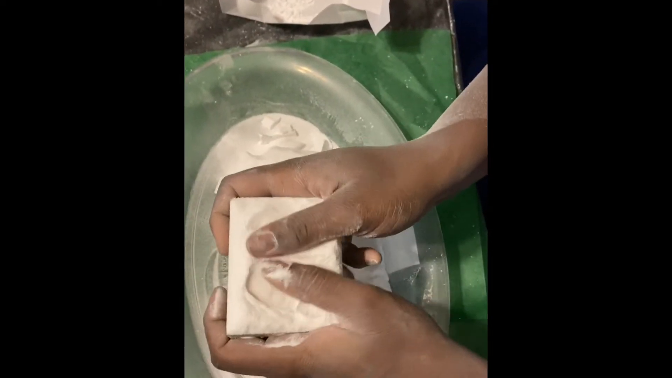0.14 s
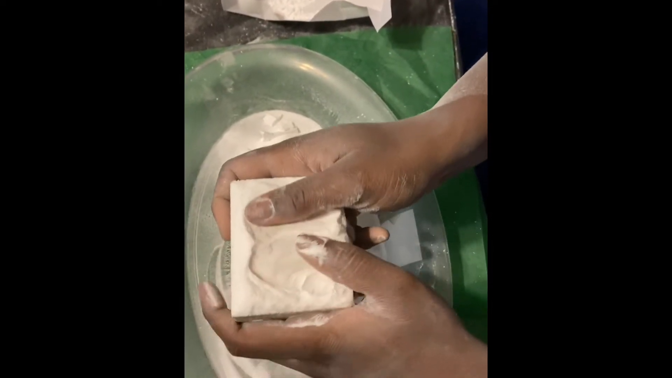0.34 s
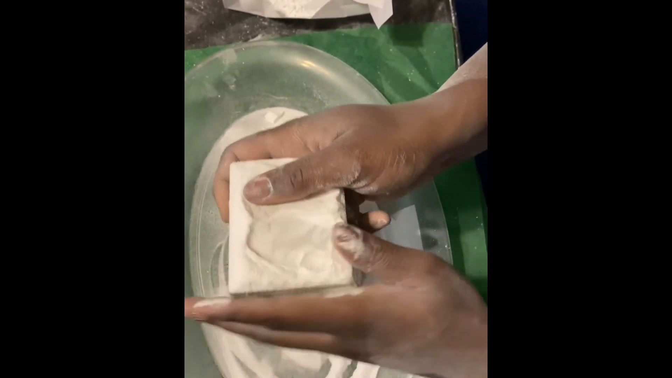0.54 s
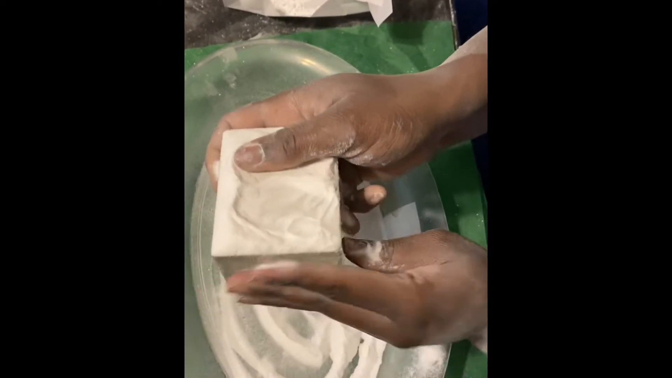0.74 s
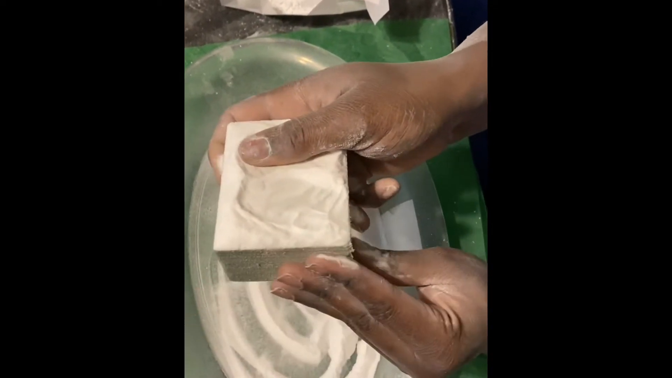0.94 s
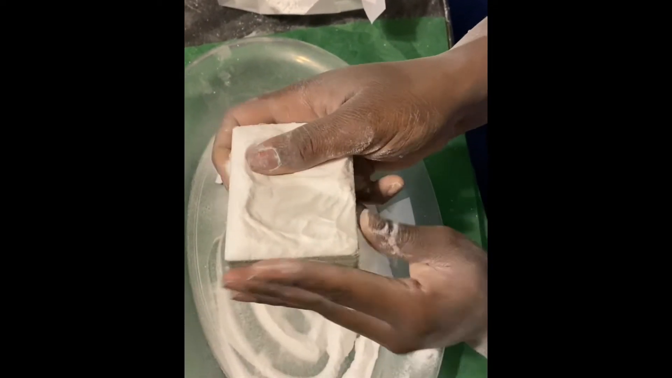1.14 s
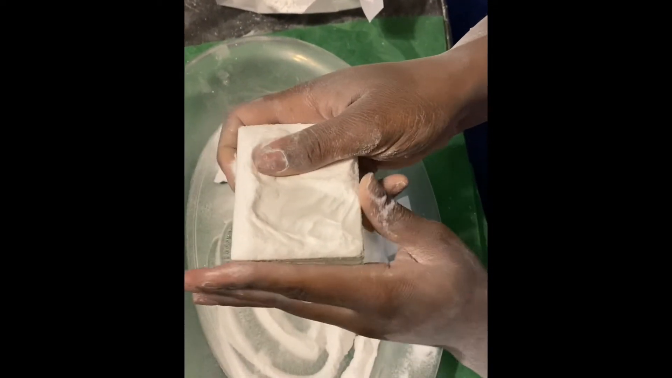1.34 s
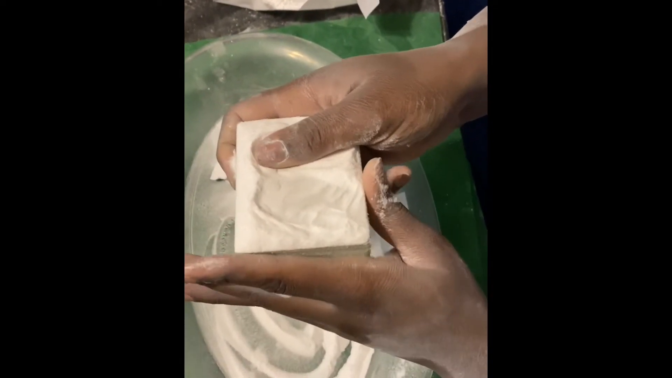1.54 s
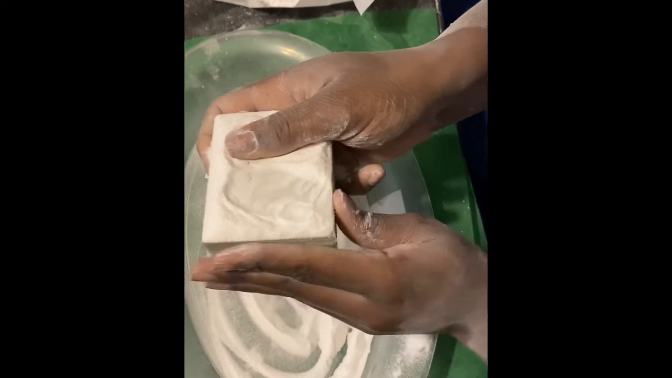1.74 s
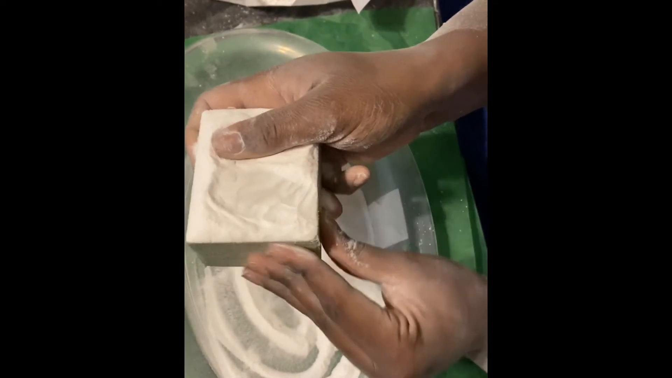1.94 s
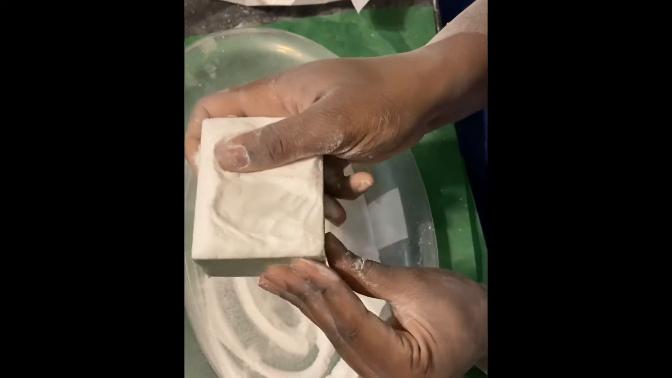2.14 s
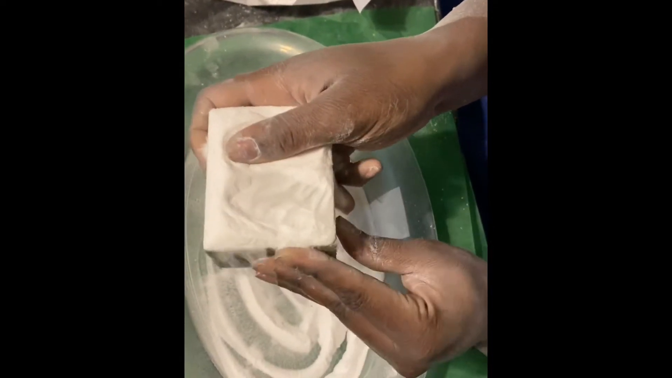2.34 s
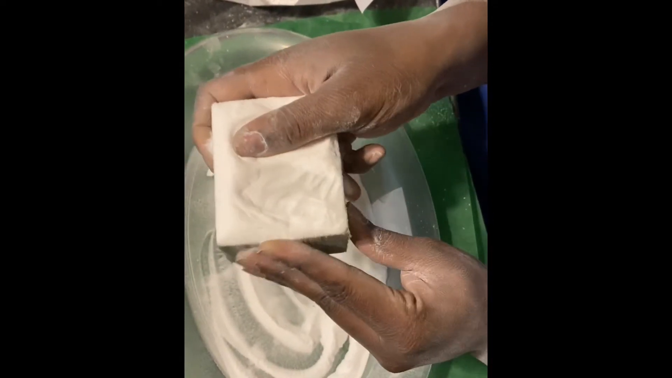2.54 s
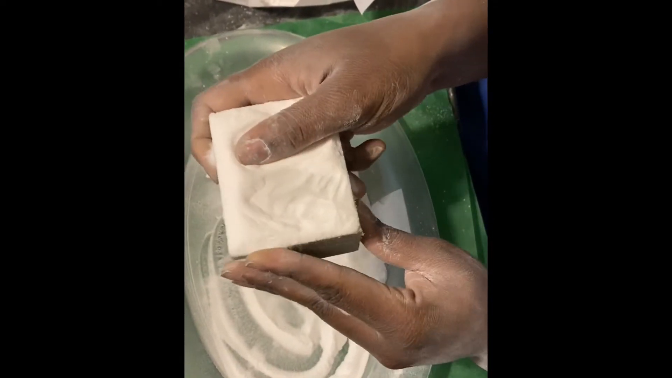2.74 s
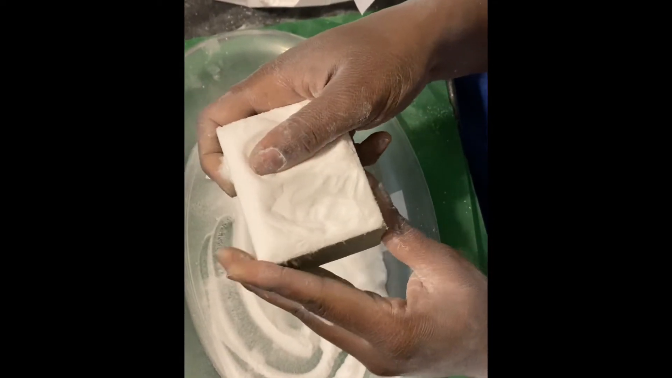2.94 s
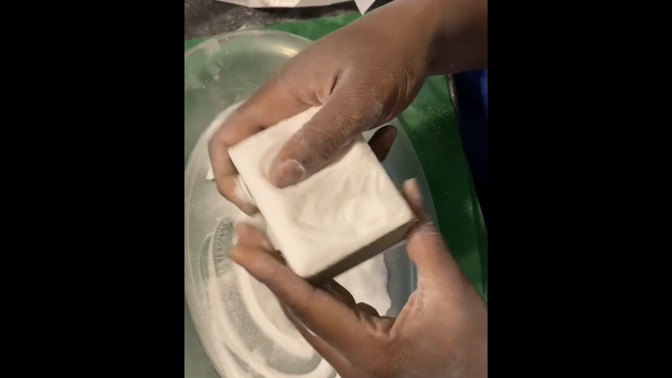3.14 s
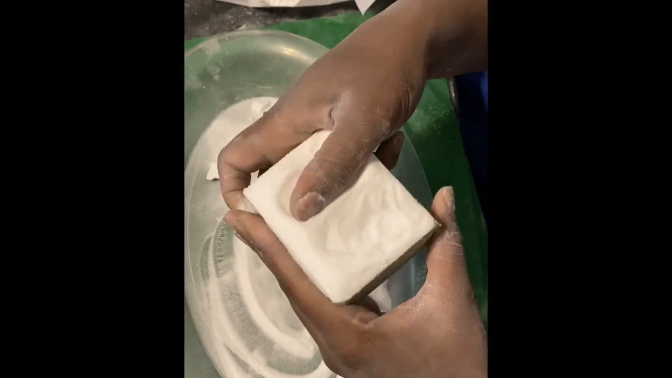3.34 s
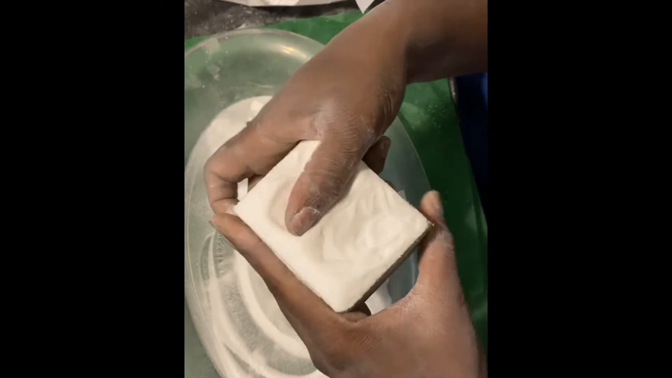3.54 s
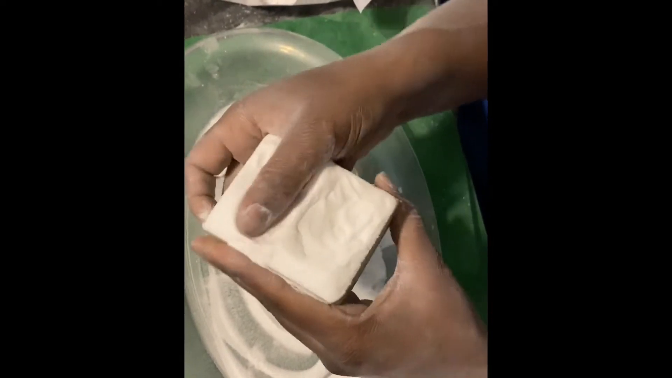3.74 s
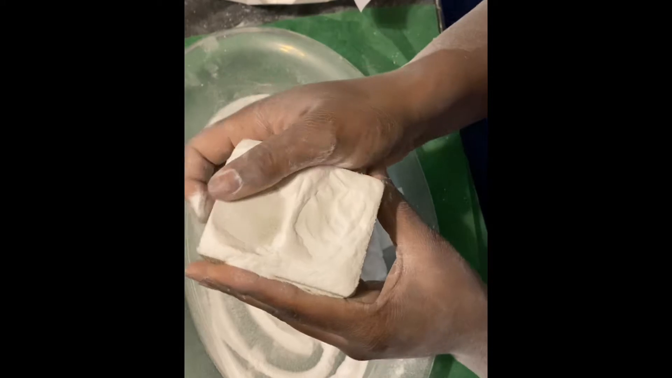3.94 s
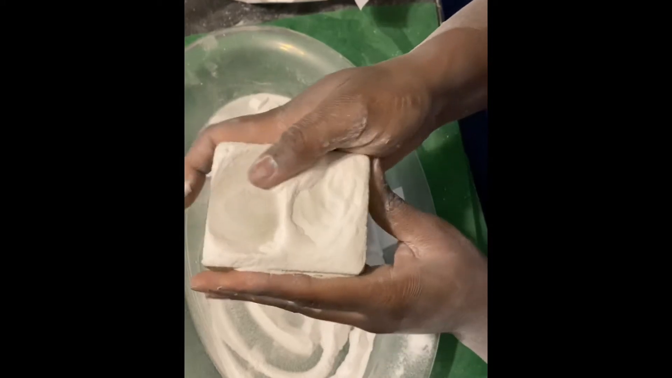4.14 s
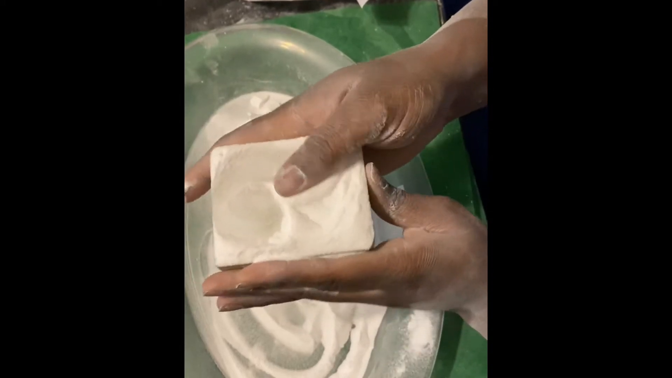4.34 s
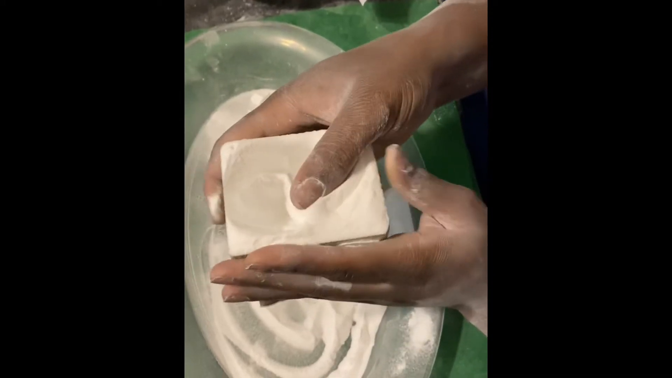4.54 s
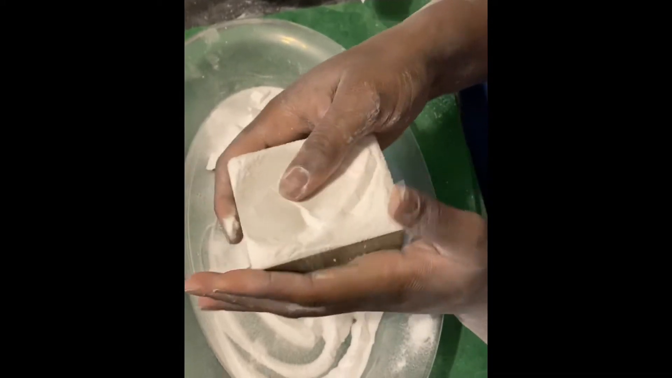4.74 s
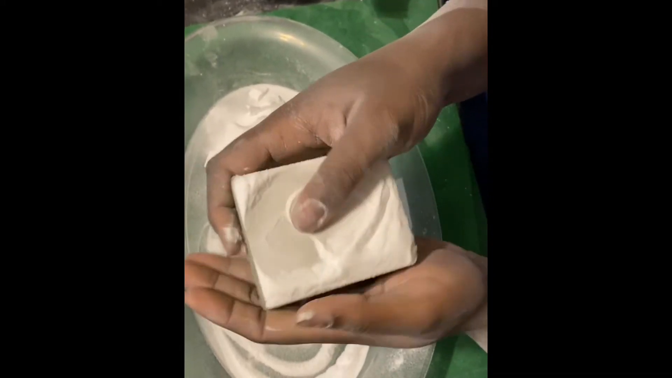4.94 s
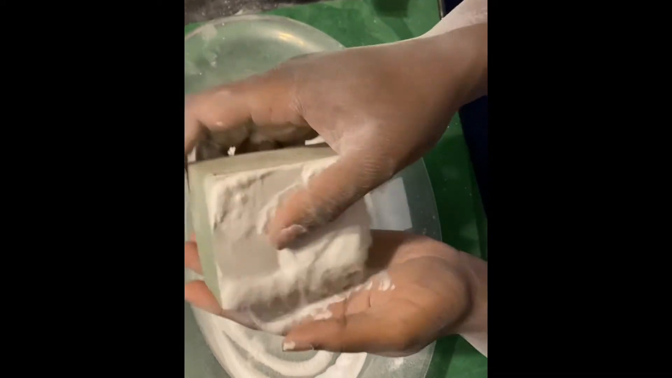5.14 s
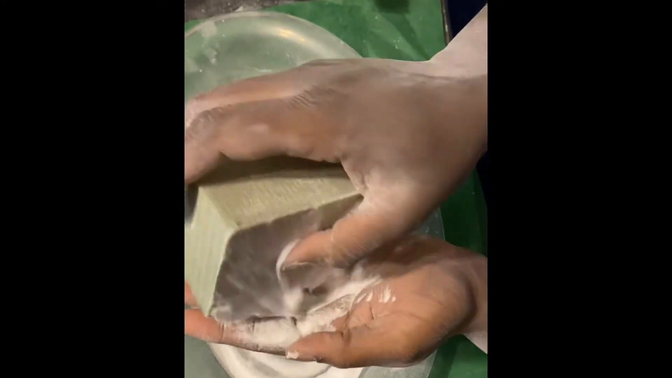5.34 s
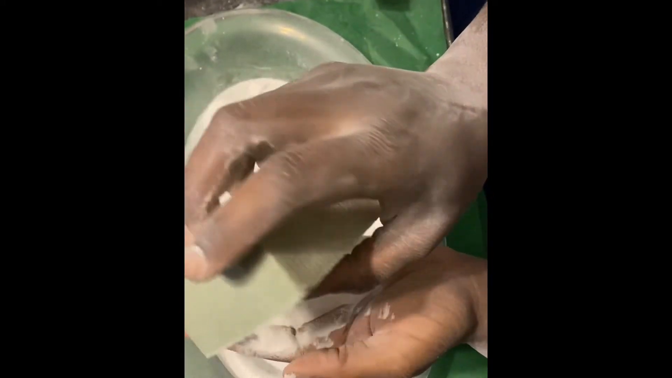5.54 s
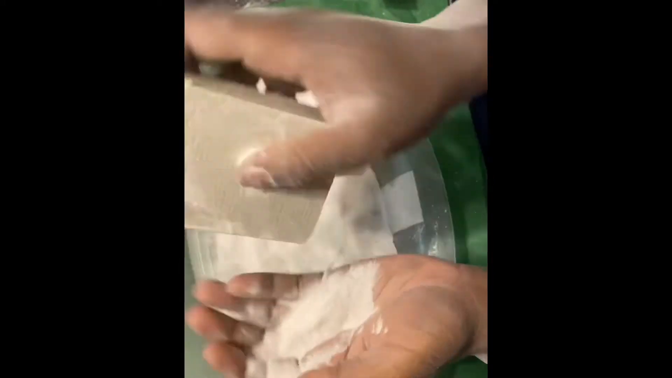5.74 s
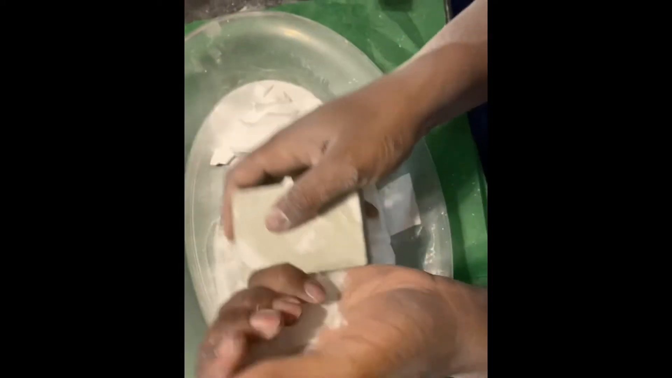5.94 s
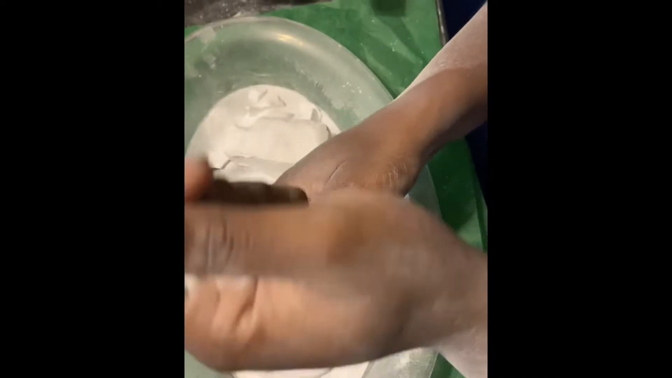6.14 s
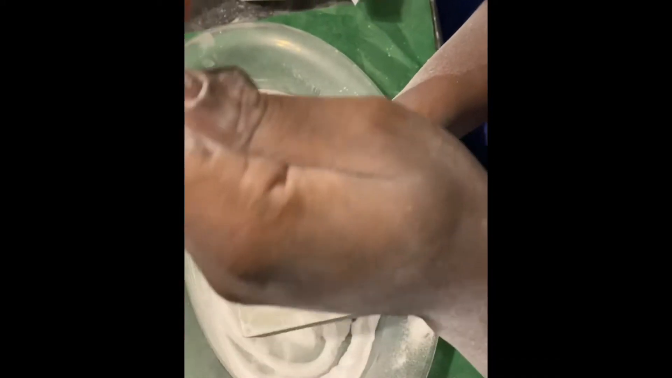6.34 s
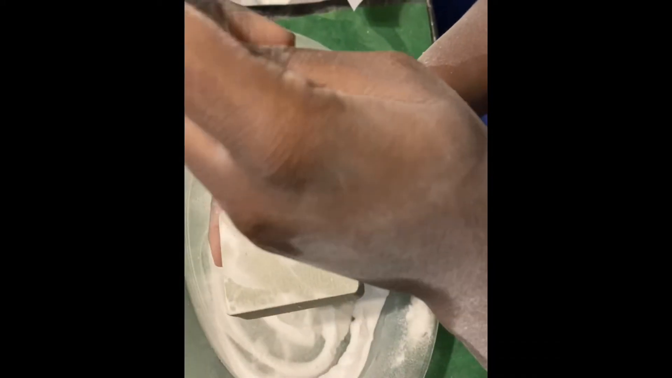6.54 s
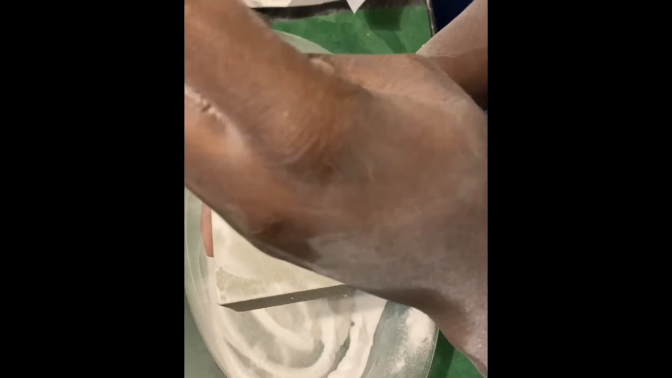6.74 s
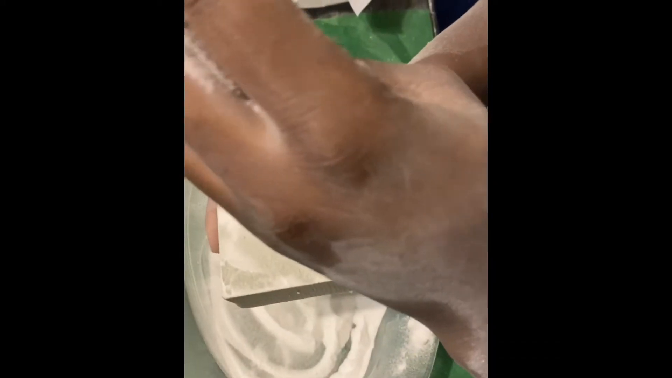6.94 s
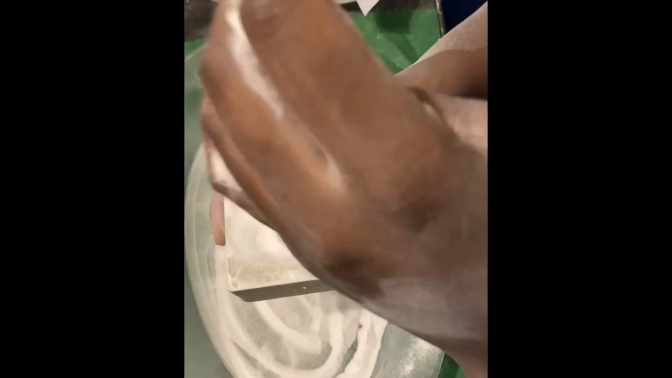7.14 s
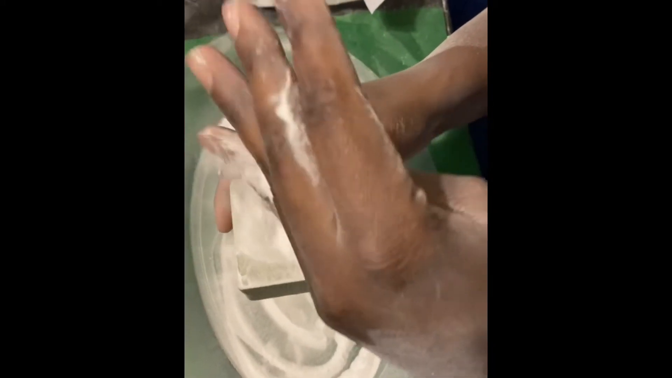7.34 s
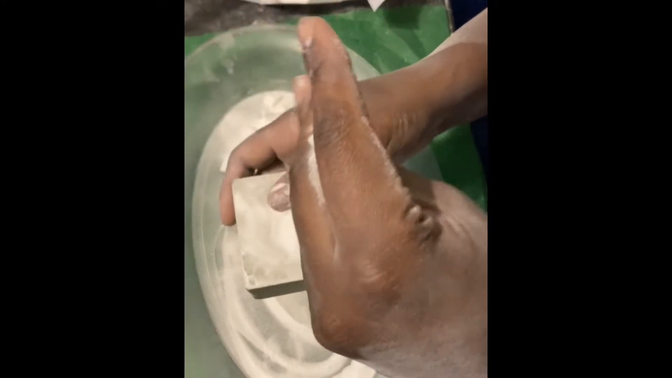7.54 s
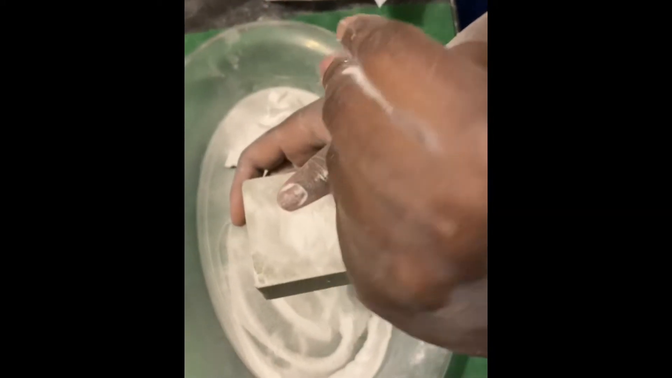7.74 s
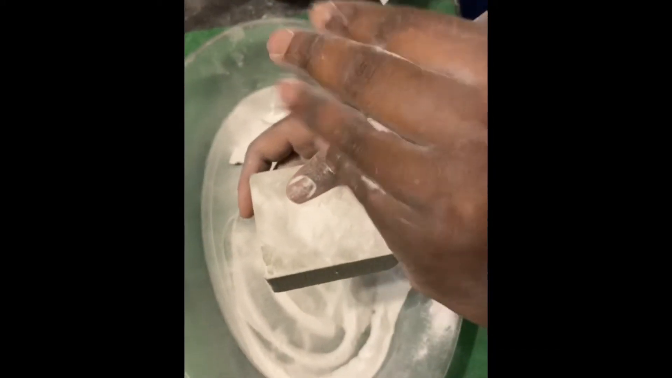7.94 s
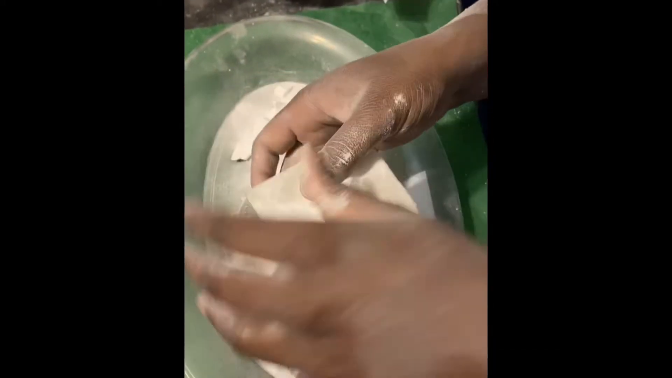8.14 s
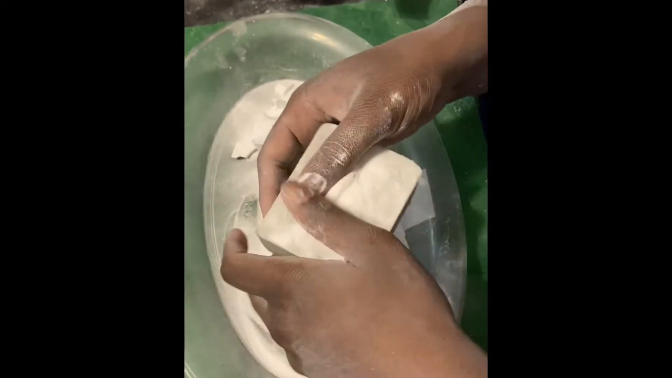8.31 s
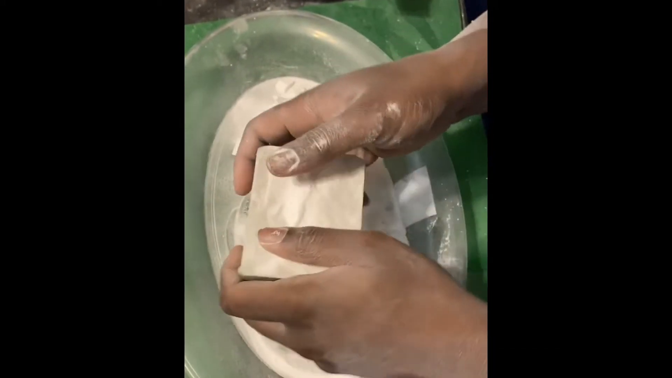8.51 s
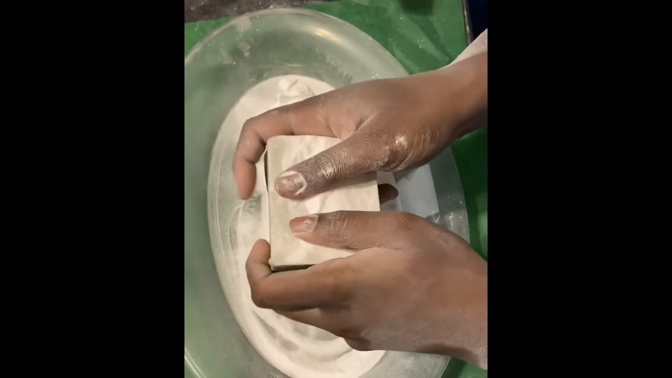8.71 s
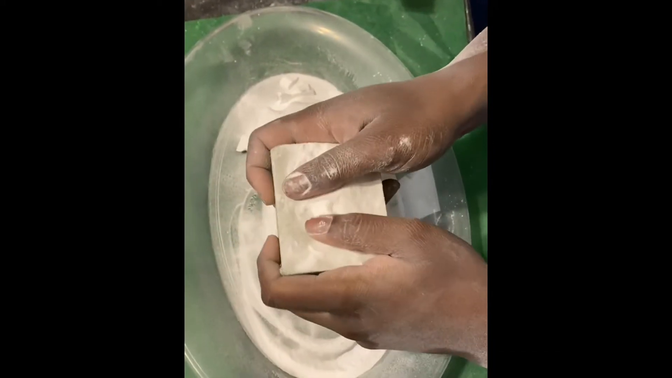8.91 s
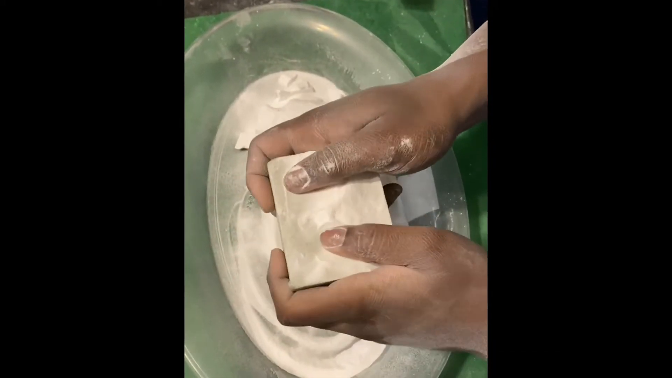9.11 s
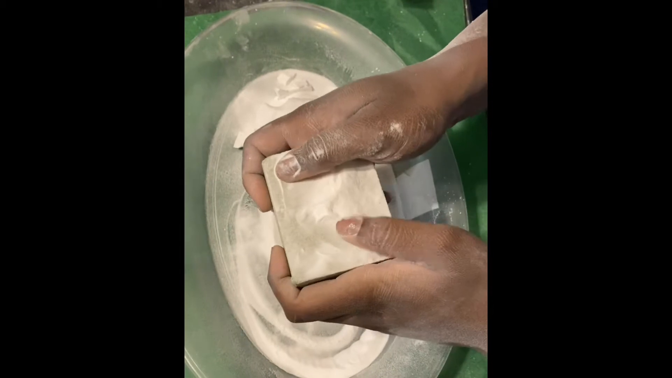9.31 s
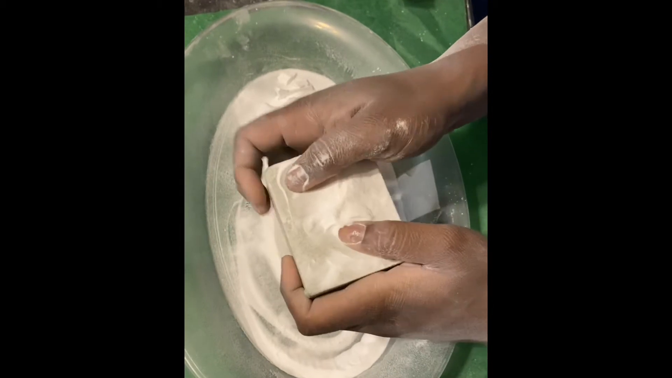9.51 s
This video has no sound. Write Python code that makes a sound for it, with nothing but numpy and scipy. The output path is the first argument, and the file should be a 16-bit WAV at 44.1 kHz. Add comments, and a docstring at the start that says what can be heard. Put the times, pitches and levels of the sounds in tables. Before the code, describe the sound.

Two hands rub and turn a powdery block of floral foam, dry crunchy scraping and soft tray knocks, pausing for quiet hand dusting, then resuming.

```python
"""Throughout, a fan and a wandering low hum in a room, with skin brushing on foam near the microphone.
From the start two hands turn and rub a powdered block of floral foam over a plastic tray: noise shaped by rubs,
flicks and the grip. Powder clumps knock on the tray as downward chirps, a finger squeaks, edges snap and skin
shudders. A hand dusts itself off softly, then the rubbing resumes. Two close microphone ports hear it in stereo."""
import sys
import numpy as np
from scipy import signal
from scipy.fft import rfft, irfft, next_fast_len
from scipy.io import wavfile
from scipy.ndimage import uniform_filter1d

SR = 44100
rng = np.random.default_rng(int(sys.argv[2]) if len(sys.argv) > 2 else 0)


def wav_record(signal):
    """Record a signal, one row per channel, as 16-bit PCM in the file named by sys.argv[1]."""
    frames = np.transpose(np.atleast_2d(signal))
    bounded = np.clip(frames, -1, 1)
    # unit amplitude maps onto the largest positive 16-bit level
    quanta = np.round(bounded * 32767).astype(np.int16)
    wavfile.write(sys.argv[1], SR, quanta)


N = 426439
TIME = np.arange(N) / SR
BINS = np.maximum(np.fft.rfftfreq(next_fast_len(N), 1 / SR), 1)

# Spectrum of the room air. Each row: frequency in Hz, relative density in dB per Hz.
AIR_SPECTRUM = [(20, -14), (60, 2), (130, 6.5), (280, 7), (500, 4.5), (700, -4.5), (1300, -11.5),
                (5000, -13), (16000, -107)]
# Steady tones of the fan. Each row: pitch in Hz, level in dB before the fan's trim and the hands' shading.
FAN_TONES = [(204.6, -63.5), (263.8, -63), (296.1, -68.5), (446.8, -68), (527.6, -67.5)]
# How much of the fan and air passes the hands. Each row: time in seconds, gain in dB.
HAND_OPENNESS = [(5.8, 0.5), (7.3, -4.5), (7.65, -3.5), (8.2, 1)]
# A low hum that wanders. Each row: time in seconds, pitch in Hz, rms level in dB.
WANDERING_HUM = [(0, 113, -60), (.45, 113, -54), (.7, 114, -70), (5.9, 122, -64.5), (7.3, 126, -70.5),
                 (7.8, 128, -60.5), (8.25, 130, -51), (9.67, 136, -61.5)]
# Dull bumping of the hands. Each row: frequency in Hz, relative density in dB per Hz.
BUMP_SPECTRUM = [(20, -36), (60, 18), (170, 12.5), (900, -104)]

# Light brushing of skin that goes on between strokes. Each row: time in seconds, level in dB before the trim.
BRUSHING_LEVEL = [(0, -40), (.77, -41), (.86, -48.5), (1.1, -29.5), (1.43, -46.5), (1.55, -32),
                  (1.95, -34.5), (2.0, -52), (2.27, -45), (2.415, -52.5), (2.7, -43.5), (4.4, -45),
                  (5.4, -51), (5.48, -58.5), (6.28, -56), (6.71, -61.5), (7.3, -55.5), (7.8, -53.5),
                  (8.4, -50.5), (8.95, -44), (9.3, -42), (9.53, -53), (9.67, -49.5)]
# Breaking cells and powder. Each row: frequency in Hz, relative density in dB per Hz.
GRIT_SPECTRUM = [(100, -44), (400, -20.5), (900, -12), (1400, -14.5), (2000, -9.5), (3000, -2.5),
                 (4200, -4), (5500, -1), (7000, 2), (9200, -0.5), (12000, 1), (15800, -4.5)]
# Weight of the block's body in the lower rubbing. Each row: time in seconds, relative weight in dB.
BODY_WEIGHT = [(.5, 7.5), (.78, 2.5), (1.6, 1.5), (1.8, 3.5), (2.2, 2.5), (2.7, 4), (3.2, -2.5), (4.1, 2),
               (4.4, -1), (5.1, -5.5), (5.3, 8.5), (5.41, -2), (5.47, 25), (5.64, 3), (6.55, 14.5),
               (7.7, 0), (8.7, 6)]
# Weight of the powder's sheen in the treble. Each row: time in seconds, relative weight in dB.
SHEEN_WEIGHT = [(1.0, -0.5), (1.65, -2.5), (2.0, 0.5), (4.5, -5), (4.9, -0.5), (5.15, -6), (6.5, -4),
                (6.9, -8.5), (7.22, -6), (7.6, 9.5), (7.95, -2)]
# The shallow hollow between the holding hand and the block. Each row: time in seconds, pitch in Hz.
HOLLOW_PITCH = [(0, 3660), (.8, 2700), (1.9, 3220), (2.7, 2870), (3.25, 3840), (3.7, 3200), (4.0, 2350),
                (4.3, 2970), (5.6, 3600)]
# A hand cups and its cavity sings. Each row: start in seconds, length in seconds, pitch in Hz, strength in dB.
CUPPED_HANDS = [(1.965, 0.25, 5170, 14.5), (4.843, 0.16, 3860, 12), (5.075, 0.24, 2160, 5),
                (5.66, 0.41, 2250, 18), (7.12, 0.22, 5570, 6), (9.646, 0.07, 2320, 11)]
# The two close microphone ports. Each row: frequency in Hz, lead of the left in radians, likeness from 0 to 1.
MIC_PORTS = [(100, -0.09, 0.918), (1000, -0.71, 0.786), (1800, -0.95, 0.738), (2500, 0.83, 0.564),
             (3500, 2.11, 0.618), (4600, 0.95, 0.629), (5500, 1.11, 0.656), (6500, 0.31, 0.856),
             (7600, 1.75, 0.757), (8600, 3.13, 0.995), (9600, 3.18, 0.982), (11000, 4.64, 0.651),
             (12000, 6.25, 0.974), (14200, 6.33, 0.943), (15600, 9.28, 0.813)]
# Side balance of the rubbing. Each row: frequency in Hz, left minus right in dB.
SIDE_BALANCE = [(500, -.5), (2400, -1), (3100, -4), (3900, 0), (5200, -1.2), (7000, 0)]

# Rubs that swell and ease off. Each row: start, swell and ease in seconds, peak in dB before the trim.
RUB_STROKES = [(0.272, 0.084, 0.016, -29.5), (0.37, 0.098, 0.13, -27), (0.478, 0.025, 0.086, -24),
               (0.564, 0.051, 0.22, -25.5), (1.109, 0.083, 0.043, -28.5), (1.215, 0.13, 0.093, -27),
               (1.515, 0.051, 0.06, -26.5), (1.585, 0.066, 0.067, -25), (1.655, 0.066, 0.12, -26),
               (1.76, 0.082, 0.091, -33), (2.315, 0.021, 0.031, -29.5), (2.79, 0.048, 0.037, -27),
               (2.868, 0.12, 0.096, -35), (3.023, 0.056, 0.062, -25), (3.15, 0.019, 0.082, -24),
               (3.231, 0.046, 0.11, -34.5), (3.308, 0.041, 0.084, -33), (3.498, 0.11, 0.27, -29),
               (3.795, 0.036, 0.067, -31), (3.858, 0.013, 0.088, -24.5), (3.9, 0.21, 0.055, -25.5),
               (4.1, 0.093, 0.2, -32.5), (4.344, 0.052, 0.14, -32), (4.46, 0.09, 0.24, -27.5),
               (4.649, 0.062, 0.12, -28), (4.77, 0.059, 0.056, -26.0), (4.849, 0.072, 0.084, -31),
               (5.074, 0.02, 0.048, -27), (5.17, 0.023, 0.052, -32), (5.529, 0.1, 0.14, -40),
               (5.799, 0.095, 0.16, -47), (5.96, 0.096, 0.015, -51), (6.755, 0.067, 0.014, -55),
               (6.866, 0.047, 0.027, -49.5), (6.971, 0.051, 0.047, -53), (7.24, 0.12, 0.11, -49.5),
               (7.56, 0.05, 0.043, -51.5), (7.815, 0.062, 0.03, -43.5), (7.889, 0.086, 0.074, -43),
               (8.072, 0.065, 0.024, -41), (8.18, 0.077, 0.094, -34), (8.46, 0.043, 0.017, -40.5),
               (8.683, 0.087, 0.06, -37), (8.822, 0.023, 0.052, -32.5), (9.13, 0.031, 0.29, -34),
               (9.209, 0.023, 0.038, -25), (9.381, 0.029, 0.018, -26.5), (9.41, 0.021, 0.091, -29),
               (9.536, 0.038, 0.03, -42)]
# A finger lands abruptly and drags. Each row: start in seconds, length in seconds, level in dB before the trim.
FINGER_FLICKS = [(0.876, 0.0043, -29.5), (0.905, 0.027, -37), (0.934, 0.15, -24.5), (2.033, 0.14, -36.5),
                 (2.185, 0.052, -23), (2.435, 0.061, -24.5), (2.558, 0.06, -25), (2.648, 0.1, -27),
                 (2.783, 0.015, -30.5), (3.139, 0.05, -26.5), (5.018, 0.091, -28), (5.141, 0.038, -34),
                 (5.307, 0.014, -31), (5.757, 0.107, -37.5), (7.151, 0.12, -45), (8.173, 0.0053, -33.5),
                 (8.655, 0.058, -30), (8.985, 0.087, -31.5), (9.077, 0.053, -32.5), (9.651, 0.019, -33.5)]
# Clumps and hands knock softly on the tray. Each row: start in seconds, peak in dB before the tray's trim,
# pitch in Hz, ring of the upper modes in dB relative to the blow.
TRAY_KNOCKS = [(0.91, -36.5, 615, -22), (1.072, -31.5, 600, -25), (1.138, -40, 120, -45),
               (1.768, -35.5, 340, -32), (1.804, -34.5, 190, -40), (2.308, -39.5, 686, -25),
               (2.369, -35.5, 745, -23), (3.372, -30, 565, -26), (3.419, -36, 600, -22),
               (3.444, -35.5, 619, -22), (3.539, -39, 600, -25), (5.5486, -14.5, 690, -19.5),
               (5.585, -33, 689, -8), (5.7024, -9.5, 915, -7.5), (5.726, -15.5, 676, -10),
               (6.555, -43, 880, -20)]
# Upper modes of the tray. Each row: frequency in Hz, relative level in dB, 60 dB decay in seconds.
TRAY_MODES = [(2015, 1.5, 0.011), (2580, -4.5, .012)]
# A fingertip squeaks on the block. Each row: time in seconds, pitch in Hz, rms level in dB.
SQUEAK_PATH = [(0.935, 375, -50), (0.98, 488, -45), (1.03, 577, -49), (1.08, 550, -57)]
# An edge of the foam snaps. Each row: start in seconds, peak in dB before the snaps' trim, decay in seconds.
EDGE_SNAPS = [(2.315, -14, 0.0014), (3.427, -12.5, 0.0071), (4.438, -13, 0.0053), (6.7273, -24.5, 0.0009),
              (9.407, -14, 0.006)]
# Skin shudders on the block. Each row: start in seconds, length in seconds, pitch in Hz, level in dB.
SKIN_SHUDDERS = [(2.726, 0.23, 150, -52), (3.334, 0.15, 92, -49), (3.537, 0.077, 70, -48),
                 (5.013, 0.26, 76, -54), (5.87, 0.018, 300, -49), (6.44, 0.16, 740, -60.5),
                 (9.327, 0.077, 69, -47.5), (9.43, 0.12, 211, -47.5)]

HOLLOW_DB = 3
PATCHY_DB, PATCHY_RATE_HZ = 1.1, 20   # the rubbing's colour shifts as the skin meets fresh foam
FLICK_ATTACK_S, FLICK_SAG_DB, FLICK_RELEASE_S = 0.0018, 4, 0.0055
FLOOR_HZ, FLOOR_T60_S, FLOOR_DB = 78, 0.098, -4.5   # the tray's floor bounces under every blow
SQUEAK_WIDTH_HZ = 45
CUTOFF_HZ = 15800


def from_db(db):
    """Decibels to gain."""
    return 10 ** (np.asarray(db) / 20)


def rms_one(x):
    """Scale to unit rms."""
    return x / np.sqrt(np.mean(x ** 2) + 1e-20)


def in_time(rows, at=TIME):
    """Each column of a curve, joined by straight lines."""
    s, *columns = np.transpose(rows)
    return [np.interp(at, s, c) for c in columns]


def at_hz(points, hz=BINS):
    """A table read on a log-frequency axis."""
    f, value = np.transpose(points)
    return np.interp(np.log(hz), np.log(np.maximum(f, 1)), value)


def filtered(x, response):
    """Apply a frequency response."""
    size = next_fast_len(N)
    return irfft(rfft(x, size) * response, size)[..., :N]


def bell(hz, centre_hz, octaves):
    """A rounded peak of height 1 on a log-frequency axis."""
    return np.exp(-.5 * (np.log2(hz / centre_hz) / octaves) ** 2)


def resonance(hz, centre_hz, t60):
    """Response of one ringing mode, 1 on top."""
    return 1 / (1 + 1j * np.pi * t60 / np.log(1000) * (hz - centre_hz ** 2 / hz))


def arch(t, start, rise, fall):
    """A smooth hump of height 1: a quarter sine up, a quarter sine down."""
    return np.sin(np.pi / 2 * np.interp(t, [start, start + rise, start + rise + fall], [0, 1, 0]))


def drift(rate_hz):
    """Slow chance with unit rms, losing strength above the rate."""
    return rms_one(filtered(rng.standard_normal(N), 1 / (1 + (BINS / rate_hz) ** 2)))


def dying(kicks, decay_s):
    """Every kick starts an exponential decay."""
    return signal.lfilter([1], [1, -np.exp(-1 / (decay_s * SR))], kicks + 1e-18)


def grains(per_s, spread_db):
    """Tiny cells break at random, each with a size of its own."""
    size_db = spread_db * np.minimum(rng.exponential(1, N), 4)
    sizes = from_db(size_db) * rng.standard_normal(N)
    return rms_one(sizes * (rng.random(N) < per_s / SR))


def tone(hz, waver_hz):
    """A slightly unsteady sine with rms 1."""
    phase = 2 * np.pi * np.cumsum(hz + waver_hz * drift(4.8)) / SR
    return np.sqrt(2) * np.sin(phase)


def room(air_db, fan_db, side_db):
    """The fan's rush and tones, shaded when a hand comes near, and the wandering hum."""
    mid, side = rms_one(filtered(rng.standard_normal((2, N)), from_db(at_hz(AIR_SPECTRUM))))
    air = from_db(air_db) * (mid + from_db(side_db) * side * [[1], [-1]])
    fan = sum(from_db(db + fan_db) * tone(hz, waver_hz=0.95) for hz, db in FAN_TONES)
    open_db, = in_time(HAND_OPENNESS)
    hum_hz, hum_db = in_time(WANDERING_HUM)
    hum = from_db(hum_db) * tone(hum_hz, waver_hz=1.02)
    return from_db(open_db) * (air + fan) + hum


def handling(effort, level_db, follow):
    """Fingers shift on the block with lumpy, dull bumps, more so when they rub hard."""
    bumps = rms_one(filtered(grains(per_s=180, spread_db=4.5), from_db(at_hz(BUMP_SPECTRUM))))
    return from_db(level_db) * effort ** follow * bumps


def stick_slip(per_s, decay_s, depth, waver_db):
    """The skin catches and lets go: every slip starts sharply and dies away; the pressure wavers within bounds."""
    kicks = (rng.random(N) < per_s / SR) * rng.uniform(0, 1, N) ** 2
    slips = dying(kicks, decay_s)
    return rms_one(1 + depth * slips) * from_db(waver_db * np.tanh(drift(38)))


def crumbs(per_s, low_hz, high_hz, cycles):
    """Coarser crumbs break off one by one, each ringing very briefly at one of ten pitches."""
    clicks = grains(per_s, spread_db=6.5)
    dealt = rng.integers(0, 10, N)
    out = 0
    for k, hz in enumerate(np.geomspace(low_hz, high_hz, 10)):
        r = from_db(-60 * hz / (cycles * SR))   # falls 60 dB in the given cycles
        w = 2 * np.pi * hz / SR
        own_clicks = clicks * (dealt == k) + 1e-18
        out = out + signal.lfilter([1 - r, 0, r - 1], [1, -2 * r * np.cos(w), r * r], own_clicks)
    return rms_one(out)


def ports(common, apart):
    """Close sound reaches the two ports partly alike, with a phase lag that changes with pitch."""
    hz, lead, alike = np.transpose(MIC_PORTS)
    alike = np.clip(np.interp(BINS, hz, alike), 0, 1)
    sides = np.array([[1], [-1]])
    phase = np.exp(.5j * sides * np.interp(BINS, hz, lead))
    path = phase * from_db(.5 * sides * at_hz(SIDE_BALANCE))
    shared = filtered(common, path * np.sqrt((1 + alike) / 2))
    opposed = filtered(apart, sides * path * np.sqrt((1 - alike) / 2))
    return shared + opposed


def reflections(hz, s, nearest_s, farthest_s, strength, sway, rate_hz):
    """Fingers and palm throw the sound back from close by: a shifting comb."""
    comb = 1
    for delay in np.geomspace(nearest_s, farthest_s, num=4):
        moving = delay * (1 + sway * np.interp(s, TIME, drift(rate_hz)))
        comb = comb + strength * np.exp(-2j * np.pi * hz * moving)
    return comb


def held(x, hollow_octaves, overtone, overtone_share, body_hz, sheen_hz):
    """The grip colours the rubbing: the block's body, hollows under the hands, the powder's sheen."""
    hz, s, frames = signal.stft(x, SR, nperseg=512)
    hz = np.maximum(hz, 1)[:, None]
    body_db, = in_time(BODY_WEIGHT, s)
    sheen_db, = in_time(SHEEN_WEIGHT, s)
    hollow_hz, = in_time(HOLLOW_PITCH, s)

    cavities = [(hollow_hz, HOLLOW_DB)]
    for start, length, pitch, db in CUPPED_HANDS:
        cavities.append((pitch, db * arch(s, start, length / 2, length / 2)))
    cavity_db = 0
    for pitch, db in cavities:
        upper = overtone_share * bell(hz, overtone * pitch, hollow_octaves)
        cavity_db = cavity_db + db * (bell(hz, pitch, hollow_octaves) + upper)

    patches_db = PATCHY_DB * sum(np.interp(s, TIME, drift(PATCHY_RATE_HZ)) * bell(hz, centre, 0.16)
                                 for centre in np.geomspace(1000, 14000, num=12))
    low_db = body_db / (1 + (hz / body_hz) ** 4)
    high_db = sheen_db / (1 + (sheen_hz / hz) ** 6)
    colour = from_db(patches_db + low_db + high_db + cavity_db + at_hz(GRIT_SPECTRUM, hz))
    colour = colour * reflections(hz, s, nearest_s=0.0006205, farthest_s=.0025,
                                  strength=0.19, sway=0.1407, rate_hz=2.5)
    colour /= np.sqrt(np.mean(np.abs(colour) ** 2, axis=0))   # colour without changing the effort
    return signal.istft(frames * colour, SR)[1][..., :N]


def rubbing(effort, level_db):
    """Countless breaking cells merge into a hiss, with a few crumbs, under the drag of the hands."""
    drag = from_db(level_db) * np.hypot(effort, flicks())
    drag = drag * stick_slip(per_s=170, decay_s=0.011, depth=0.36, waver_db=0.5)
    drag = drag + snaps(level_db=-14)

    def breaking():
        """Hiss of fine cells with crumbs in it, following the drag."""
        hiss = rng.standard_normal(N)
        coarse = crumbs(per_s=600, low_hz=1620, high_hz=7800, cycles=17.0)
        return drag * (hiss + from_db(-22.5) * coarse)

    close = ports(breaking(), breaking())
    return held(close, hollow_octaves=0.14, overtone=1.32, overtone_share=0.25, body_hz=2040, sheen_hz=8500)


def rubs():
    """The hand speeds up and slows down in each rub; overlapping rubs add in power."""
    power = sum((from_db(db) * arch(TIME, s, swell, ease)) ** 2 for s, swell, ease, db in RUB_STROKES)
    return np.sqrt(power)


def flicks():
    """A finger lands abruptly, drags with fading force and lifts off."""
    out = np.zeros(N)
    for s, length, db in FINGER_FLICKS:
        span = (TIME >= s) & (TIME < s + length + 10 * FLICK_RELEASE_S)
        t = TIME[span] - s
        force = from_db(db - FLICK_SAG_DB * np.minimum(t / length, 1))
        landing = 1 - np.exp(-t / FLICK_ATTACK_S)
        lifting = np.exp(-np.maximum(t - length, 0) / FLICK_RELEASE_S)
        out[span] += force * landing * lifting
    return out


def clumps(travel_s, octaves, thump_hz, thump_db, rim_s, rim_gain, level_db):
    """A soft blow runs through the tray as a bending wave: highs arrive first, so it chirps downwards."""
    out, size = np.zeros(N), 8192
    hz = np.maximum(np.fft.rfftfreq(size, 1 / SR), 1)
    bending = np.exp(-4j * np.pi * travel_s * np.sqrt(1000 * hz))   # travel_s is the delay at 1 kHz
    # a weaker wave returns from the rim
    rim = 1 + rim_gain * bell(hz, 700, 0.49) * np.exp(-2j * np.pi * hz * rim_s)
    upper = sum(from_db(db) * resonance(hz, mode_hz, t60) * bell(hz, mode_hz, 0.43)
                for mode_hz, db, t60 in TRAY_MODES)
    thump = from_db(thump_db) * bell(hz, thump_hz, 1.46)
    floor = from_db(FLOOR_DB) * resonance(hz, FLOOR_HZ, FLOOR_T60_S)
    for s, peak_db, pitch_hz, ring_db in TRAY_KNOCKS:
        spectrum = bell(hz, pitch_hz, octaves) + from_db(ring_db) * upper + thump + floor
        blow = irfft(bending * rim * spectrum)
        at = round(s * SR)
        out[at:at + size] += from_db(peak_db + level_db) * blow / np.abs(blow).max()
    return out


def squeak(width_hz):
    """Sticking and slipping fall loosely into step: a hoarse note that follows the fingertip's speed."""
    hz, db = in_time(SQUEAK_PATH)
    touching = 1. * ((TIME > SQUEAK_PATH[0][0]) & (TIME < SQUEAK_PATH[-1][0]))
    touching = uniform_filter1d(touching, size=400)   # soft edges
    phase = 2 * np.pi * np.cumsum(hz) / SR
    hoarse = drift(width_hz) * np.cos(phase) + drift(width_hz) * np.sin(phase)
    return touching * from_db(db) * hoarse


def snaps(level_db):
    """A row of cells gives way at once: a sudden drag that dies away."""
    return sum(dying(from_db(peak_db + level_db) * (np.arange(N) == round(s * SR)), decay_s)
               for s, peak_db, decay_s in EDGE_SNAPS)


def shudders(octaves):
    """Skin that judders over the block gives a short groan: a swell of noise around one pitch."""
    out = np.zeros(N)
    for s, length, pitch_hz, level_db in SKIN_SHUDDERS:
        swell = np.sqrt(np.abs(np.sin(np.pi * np.clip((TIME - s) / length, 0, 1))))
        groan = rms_one(filtered(rng.standard_normal(N), bell(BINS, pitch_hz, octaves)))
        out += from_db(level_db) * swell * groan
    return out


def scene():
    """Rubbing, falling powder and handling over the room."""
    brushing_db, = in_time(BRUSHING_LEVEL)
    effort = np.hypot(rubs(), from_db(brushing_db))
    air = room(air_db=-58.0, fan_db=-2.0, side_db=-11.5)
    bumps = handling(effort, level_db=-55.0, follow=0.24)
    foam = rubbing(effort, level_db=0.68)
    tray = clumps(travel_s=0.003795, octaves=0.32, thump_hz=203, thump_db=-6,
                  rim_s=0.00446, rim_gain=0.18, level_db=-2.5)
    dull = tray + shudders(octaves=0.43) + squeak(SQUEAK_WIDTH_HZ) + bumps
    return foam + dull * from_db([[-.3], [.3]]) + air   # dull sounds sit slightly to the right


def record(dry):
    """The top is cut steeply."""
    return filtered(dry, 1 / np.sqrt(1 + (BINS / CUTOFF_HZ) ** 200))


dry = scene()
out = record(dry)
wav_record(out)
```